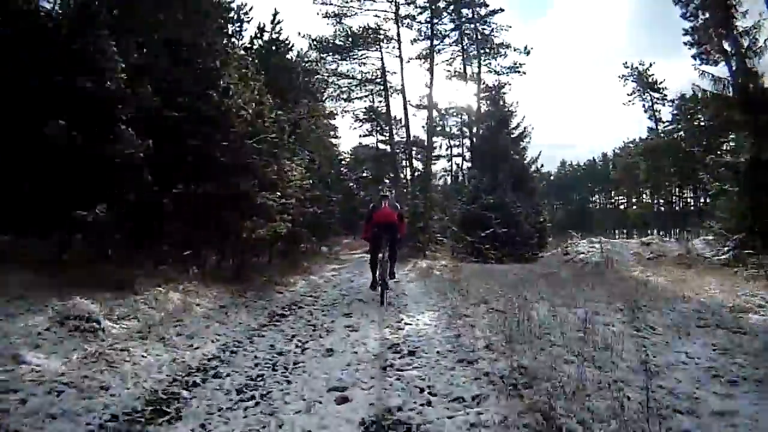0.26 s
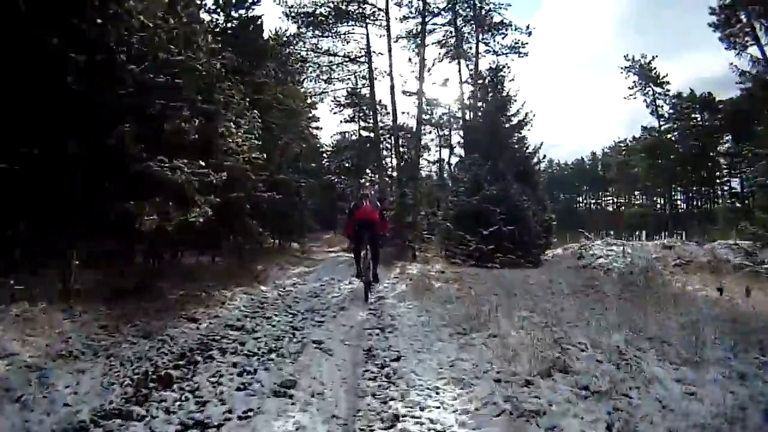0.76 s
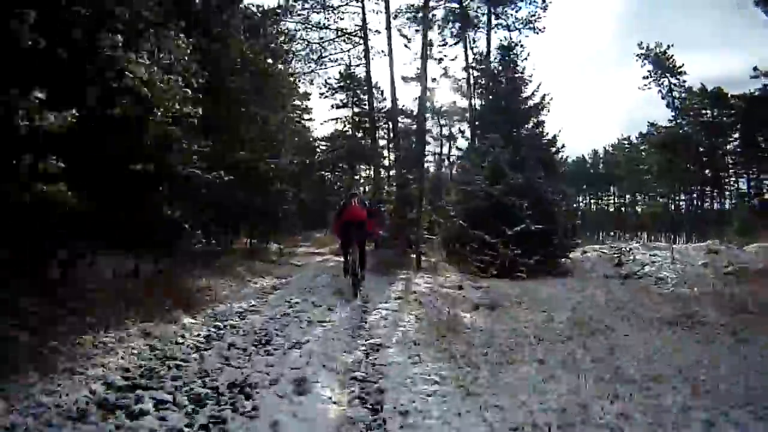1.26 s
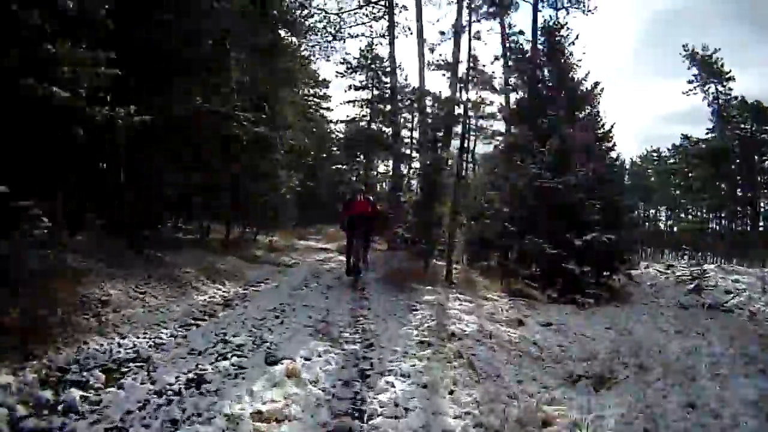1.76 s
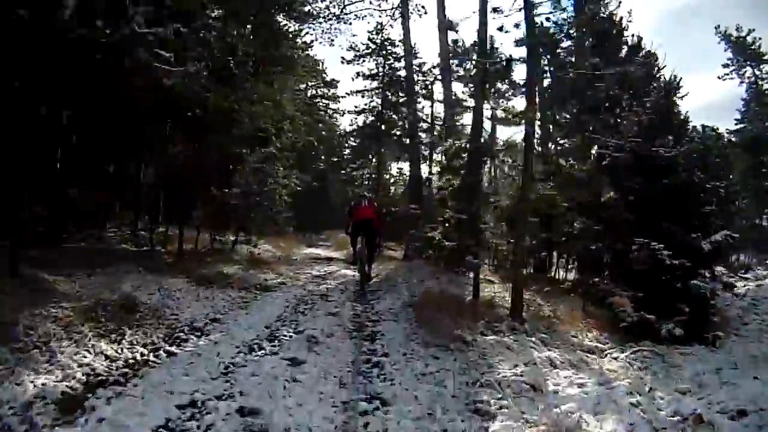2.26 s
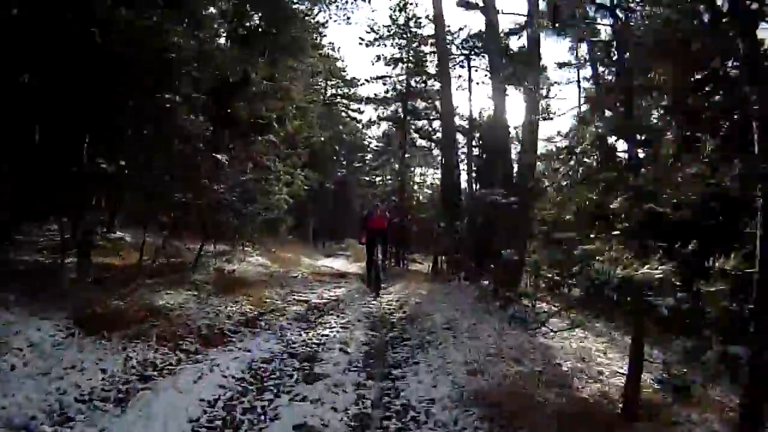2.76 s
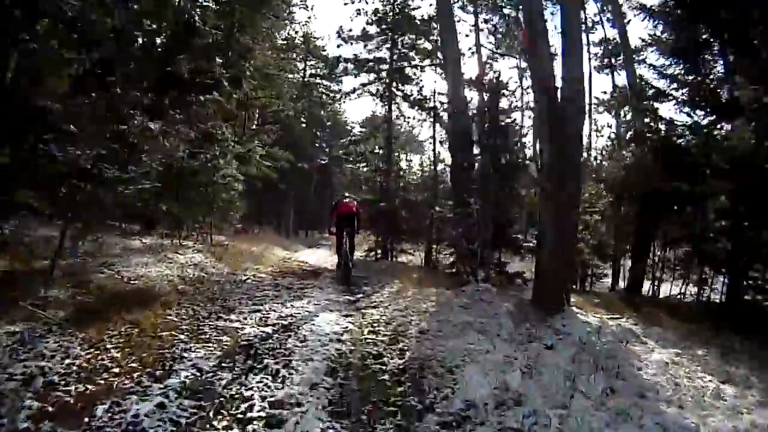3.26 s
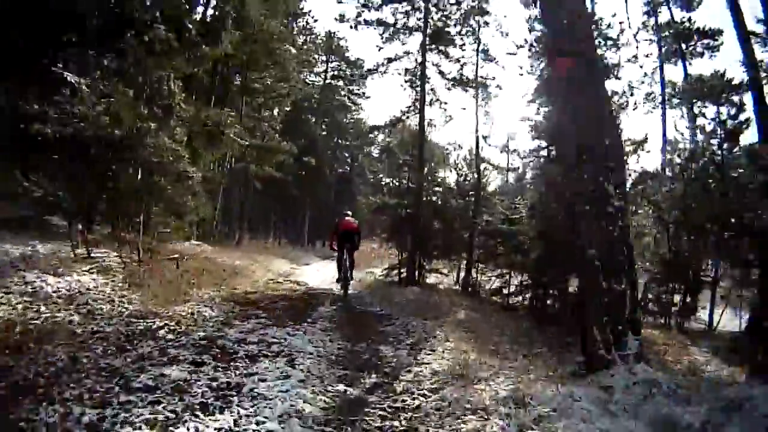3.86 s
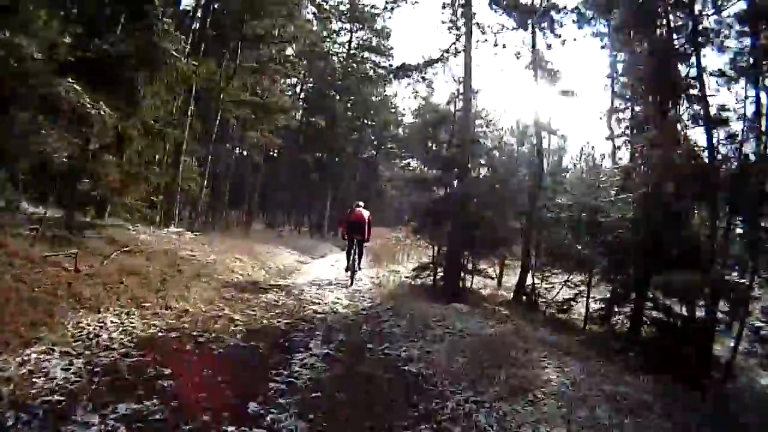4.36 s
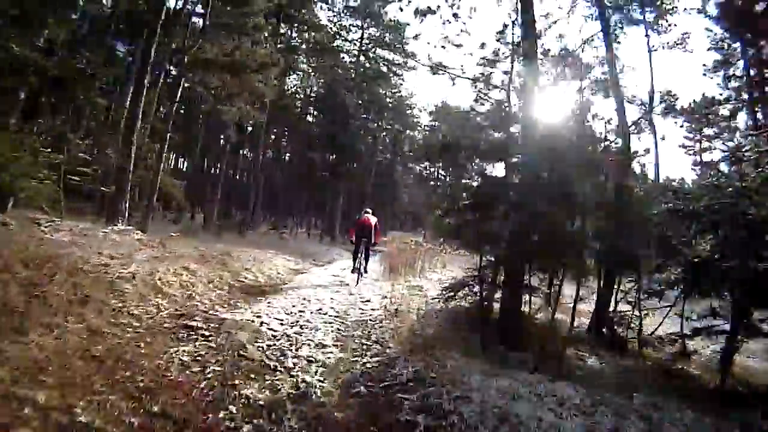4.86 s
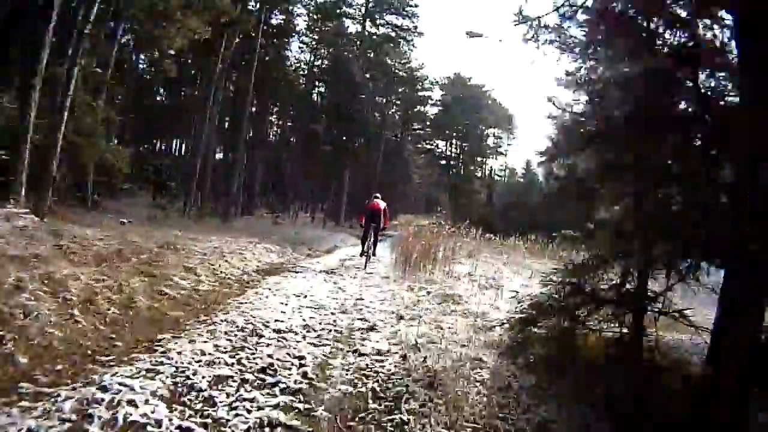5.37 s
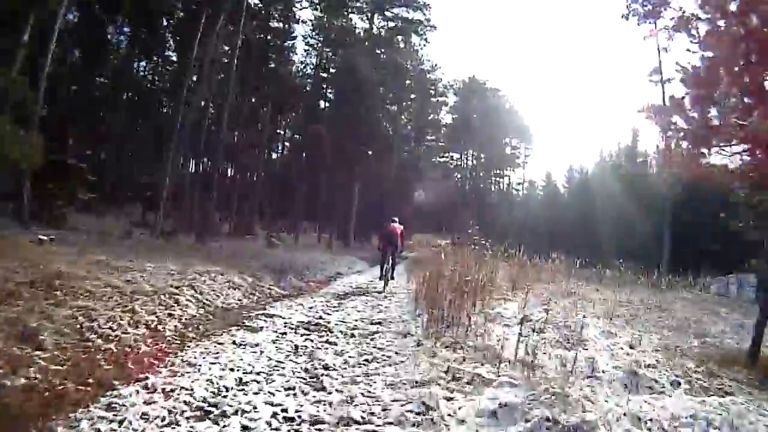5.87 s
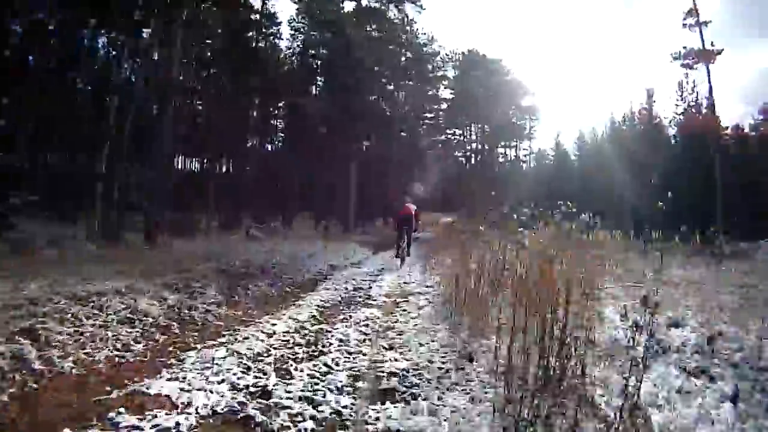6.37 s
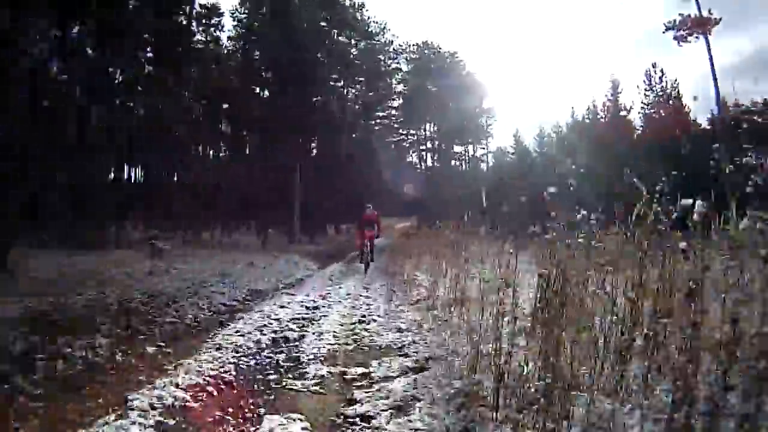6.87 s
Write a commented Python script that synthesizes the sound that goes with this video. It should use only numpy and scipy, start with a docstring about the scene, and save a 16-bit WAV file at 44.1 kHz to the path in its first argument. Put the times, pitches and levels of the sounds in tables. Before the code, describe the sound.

A bicycle rides a frozen forest track, heard through a small camera clamped to the bike. Throughout, deep frame sway around 50 Hz and low mount rumble surge unevenly, beneath a quieter, grainy crunch of tyres on icy grit. From 0 to 3 s it is relatively calm: scattered tiny plastic ticks and weak thumps, with clearer clicks around 2.3 s. A sharp tick comes at 3.2 s; from 3.55 bumps build to the hardest clack at 3.7 s, with a brief buzz and crunch. It eases, then double knocks hit at 4.55-4.65 s. From 5 to 6.4 s the ground is loose and rough: frequent thumps, bright grit snaps, case chatter and short buzzes. Afterwards ticks thin out, while low surges swell at 6.8 and 7 s, with a last thump. Sound is close, dry, nearly mono, with coarse digital brightness and faint stereo fizz.

```python
"""A frozen, bumpy forest track, heard by a small camera clamped to a bicycle.
Tyre rumble and frame sway are noise-driven resonances that reach the microphone through the mount.
Grit crunches as dense grains and cracks as bright clicks; bumps thump the mount as struck resonances,
and the plastic case ticks, chatters and buzzes. A slow converter holds each sample, so the lows
reappear as bright images; a grainy copy of the sound, mostly treble, sets left and right apart."""
import sys
import numpy as np
from scipy import signal
from scipy.fft import rfft, irfft
from scipy.io import wavfile
from scipy.ndimage import uniform_filter1d

SR = 44100
rng = np.random.default_rng(int(sys.argv[2]) if len(sys.argv) > 2 else 0)


def materialize(psi):
    """Save the field psi as 16-bit PCM at rate SR to the path in sys.argv[1].

    A 1-D psi becomes a single channel; in a 2-D psi each row is a channel.
    """
    bounded = np.clip(np.atleast_2d(psi).T, -1, 1)
    quanta = np.round(bounded * 32767).astype(np.int16)
    wavfile.write(sys.argv[1], SR, quanta)


def attenuation_scalar(level_db):
    """Turn a level in dB into a linear amplitude multiplier (20 dB per decade)."""
    decades = np.asarray(level_db, float) / 20
    return 10 ** decades


N = 313551
TIME_S = np.arange(N) / SR

# slow base levels of the ride, before surges, patches and mix gains: (time [s], frame sway [dB],
# mount rumble [dB], tyre crunch [dB], looseness of the grit [dB])
RIDE_LEVELS = [(0.0, -31.5, -36, -54, -75), (1.15, -32, -33.5, -47.5, -74), (1.84, -31, -33, -49.5, -70.5),
               (2.1, -31.5, -36, -50, -73.5), (2.59, -27, -33.5, -51, -73), (3.01, -31, -35, -49.5, -73),
               (3.54, -30, -33.5, -48.5, -74), (3.7, -31, -36, -51.5, -65), (4.39, -30.5, -33.5, -50, -73),
               (5.05, -23.5, -32, -51, -66), (5.21, -25, -30.5, -50, -57.5), (5.66, -28, -29, -50, -58.5),
               (5.84, -27, -30, -51.5, -58), (6.02, -24, -36.5, -48.5, -70), (6.69, -29, -33.5, -51, -70),
               (7.11, -32, -26.5, -47, -69.5)]
# smooth surges of the frame on long humps: (middle [s], half-length [s], sway rise [dB])
HUMP_SURGES = [(0.3, 0.062, 1), (0.484, 0.063, 4.5), (0.81, 0.085, 4), (1.83, 0.077, 7.5),
               (2.254, 0.087, 7), (2.612, 0.17, 0), (2.923, 0.085, 5), (3.113, 0.12, 3),
               (3.283, 0.063, 5.5), (3.466, .12, 6), (3.663, 0.068, 10), (4.023, 0.22, 7),
               (4.31, 0.15, 6.5), (4.447, 0.054, 7), (4.617, 0.13, 7), (4.926, 0.18, 6), (5.1, .14, 1),
               (5.24, 0.055, 1), (5.73, 0.14, 6), (6.067, 0.17, 0), (6.28, 0.24, 2), (6.612, 0.034, 5),
               (6.44, 0.1, 3), (6.766, 0.19, 11), (7.014, 0.13, 13)]
# rough ground under the wheels: (middle [s], half-length [s], rumble rise [dB], crunch rise [dB])
ROUGH_PATCHES = [(0.325, .06, 2.5, 5), (0.601, .06, -1.5, 3), (0.907, .1, 6.5, 3), (1.24, 0.056, 2, 1.5),
                 (1.542, .1, 4.5, 5.5), (1.824, .1, -1, 3.5), (1.988, .08, 6, 7), (2.341, .08, 1.5, 4),
                 (2.963, .08, 4, 3.5), (3.245, .05, 6.5, 5.5), (3.554, .04, 7, 7), (3.643, .08, 15.5, 14.5),
                 (3.702, 0.018, 7, 13), (3.922, 0.043, 11, 4.5), (3.981, .06, 13, 9.5),
                 (4.428, 0.084, 6.5, 4), (4.645, .07, 16.5, 14.5), (4.851, .08, -0.5, 3.5),
                 (5.053, .1, 1.5, 13.5), (5.258, .08, 5, 10), (5.646, .08, -5, 4.5), (5.743, .06, -9, 8.5),
                 (5.951, .14, 6, 8.5), (6.192, .08, 11.5, 5.5), (6.327, .14, 8, 7), (6.519, .06, 3, 5.5),
                 (6.712, .1, 6, 5), (6.938, .1, 1, 5)]
# frame resonances: (frequency [Hz], bandwidth [Hz], relative level [dB])
FRAME_MODES = [(27.6, 16, -15.5), (48.6, 11.6, 5), (85.5, 78, -2)]
# mount resonances: (frequency [Hz], bandwidth [Hz], relative level [dB])
MOUNT_MODES = [(113.6, 45, -5), (205, 44.2, -1.5), (246, 69.5, 0.5), (354.7, 71, -5.5), (486.7, 39, -8)]
# plastic case resonances: (frequency [Hz], bandwidth [Hz], relative level [dB])
CASE_MODES = [(914, 500, -3), (1324, 140, -14), (2110, 356, 1.5), (2435, 402, 3.5), (2970, 420, 1),
              (2850, 15, -29.5), (3793, 325, -3), (4000, 45, -34), (4140, 430, -19), (6040, 3200, -53)]
# colour of the crunch after its way through frame and case: (frequency [Hz], relative level [dB])
CRUNCH_COLOUR = [(350, -62), (600, -27), (660, -15.5), (755, -1), (1030, -6), (1270, -5.5), (1700, -9),
                 (2470, -6.5), (3260, -18), (5900, -29.5), (7670, -23), (13000, -120)]
# dry cracks of flung grit: (time [s], relative level [dB])
GRIT_CRACKS = [(3.699, -28), (3.74, -44), (5.07, -29), (5.1302, -45), (5.204, -48), (5.252, -52),
               (5.3, -51), (5.3478, -38), (5.4264, -33), (5.4566, -38), (5.564, -44), (5.617, -34),
               (5.702, -28), (5.729, -49), (5.867, -49), (5.878, -36.5), (5.889, -44), (5.9284, -38),
               (5.997, -38), (6.253, -36), (6.265, -38), (6.313, -30)]
# clear case ticks: (time [s], relative level [dB], favoured frequency [Hz])
CASE_TICKS = [(0.0277, -22, 2140), (0.5322, -19, 2480), (0.7766, -23.5, 3000), (1.1456, -28.5, 2800),
              (1.5658, -16.5, 2400), (1.6893, -31, 2270), (1.7923, -20, 2330), (1.847, -33, 2160),
              (1.8693, -16, 2400), (1.9462, -21, 2510), (1.9704, -25.5, 2490), (1.9889, -27, 2510),
              (2.0241, -15, 2470), (2.1165, -28, 2400), (2.3194, -31, 2470), (2.3362, -11.5, 2440),
              (2.365, -30, 2510), (2.4717, -13.5, 2390), (2.7008, -28.5, 2440), (2.7563, -31, 2440),
              (2.9039, -26.5, 2290), (2.958, -15, 2680), (3.173, -27, 2240), (3.2355, -2.5, 2220),
              (3.2389, -10, 2840), (3.2534, -28, 2860), (3.47, -29, 2830), (3.4925, -21, 2190),
              (3.5864, -24, 2120), (3.6207, -19, 2260), (3.6317, -10, 2930), (3.642, -19, 2960),
              (3.6716, -11.5, 2990), (3.6986, 5, 2000), (3.7354, -16, 2340), (3.7515, -18, 2860),
              (3.779, -30, 2020), (3.8013, -29, 2190), (3.8162, -32, 2170), (3.8396, -23, 2110),
              (3.9235, -25, 2330), (3.9438, -16, 2100), (3.965, -33, 2210), (3.9829, -12, 2550),
              (4.0125, -32, 3100), (4.3847, -18, 2340), (4.433, -24, 2200), (4.4499, -15.5, 2540),
              (4.5474, -22.5, 2100), (4.6314, -19, 2090), (4.6463, -1.5, 1880), (4.6694, -18, 2210),
              (4.716, -21, 2320), (4.7658, -11.5, 2590), (4.821, -24, 2390), (4.8998, -14.5, 2650),
              (4.9748, -24, 2200), (5.0509, -7, 2530), (5.0694, -21, 2220), (5.1198, -18.5, 2540),
              (5.1822, -10.5, 2600), (5.2375, -19, 2510), (5.2472, -12, 2160), (5.2942, -25, 2270),
              (5.3517, -21.5, 2230), (5.419, -25, 3640), (5.464, -13.5, 2480), (5.523, -31, 2510),
              (5.5815, -26, 2250), (5.6316, -23, 3030), (5.6557, -9.5, 2280), (5.6698, -19.5, 2880),
              (5.7037, -15, 2240), (5.7494, -9, 2260), (5.768, -29, 2130), (5.7827, -27, 2160),
              (5.8065, -24, 2150), (5.8731, -32, 2130), (5.9079, -12, 2390), (5.9582, -6, 2450),
              (5.974, -28, 2210), (6.0177, -23.5, 2400), (6.0566, -27.5, 2380), (6.2104, -12, 2450),
              (6.297, -7, 2440), (6.315, -15, 2260), (6.353, -6, 2600), (6.3714, -13, 2340),
              (6.53, -13, 2450), (6.538, -18.5, 2240), (6.8424, -9, 2600), (6.8564, -12, 2300),
              (6.9098, -25.5, 2440), (7.0419, -19.5, 2090)]
# bumps that strike the mount: (time [s], relative level [dB], favoured frequency [Hz])
MOUNT_BUMPS = [(0.534, -22.5, 482), (0.595, -25, 213), (0.896, -17, 283), (1.77, -30, 223),
               (1.853, -21, 250), (2.337, -20, 482), (2.424, -15.5, 253), (2.519, -24, 248),
               (2.566, -19, 226), (3.238, -23, 412), (3.557, -10, 246), (3.601, -17, 256),
               (3.633, -11.5, 266), (3.693, -4.5, 409), (3.905, -21, 234), (3.983, -12, 194),
               (4.547, -6, 299), (4.584, -16.5, 283), (4.617, -10.5, 205), (4.634, -3.5, 205),
               (4.645, -2, 467), (4.764, -22, 476), (4.849, -13.5, 234), (5.003, -12, 264),
               (5.039, -11.5, 202), (5.066, -6, 221), (5.224, -12.5, 205), (5.291, -10.5, 252),
               (5.35, -5.5, 300), (5.608, -12.5, 257), (5.628, -3, 317), (5.695, -16.5, 226),
               (5.721, -11, 255), (5.749, -14, 220), (5.919, -14, 223), (5.965, -6.5, 223),
               (5.982, -7.5, 220), (6.116, -19, 199), (6.156, -16, 256), (6.227, -12.5, 221),
               (6.294, -20, 269), (6.34, -15.5, 253), (6.366, -9, 226), (6.533, -20, 239),
               (6.678, -23, 223), (6.717, -9.5, 213), (6.916, -12.5, 230), (6.977, -20, 215),
               (7.04, -8.5, 276)]
# buzzing of the case in its clamp: (start [s], length [s], relative level [dB])
CASE_BUZZES = [(3.549, 0.023, -42), (3.59, 0.039, -36), (3.624, 0.04, -29.5), (3.695, 0.0073, -11.5),
               (3.905, 0.018, -44), (3.941, 0.014, -28), (4.007, 0.027, -46.5), (4.628, 0.05, -35.5),
               (4.645, 0.0057, -20), (5.041, 0.036, -29.5), (5.241, 0.014, -26), (5.422, .014, -35),
               (5.612, 0.034, -34.5), (5.872, .03, -45), (5.953, 0.032, -31), (6.181, 0.011, -41.5),
               (6.249, 0.023, -38.5)]

CLUMP_DB = 9   # spread of the fine grit's rate
FAINT_TICKS, FAINT_DB, FAINT_SPREAD_DB, FAINT_HZ = 60, -31.5, 5, 2400   # count, middle, either way, middle
CONVERTER_HZ, TOP_HZ = 12000, 16200   # converter sample rate, corner of the steep low-pass


def rms_one(x):
    """Normalisation: equal mean power, rms 1."""
    return x / np.sqrt(np.mean(x ** 2) + 1e-20)


def drift(rate_hz):
    """Low-pass random process: noise at SR / 20 through two equal poles, spread 1, then interpolated."""
    pole = np.exp(-40 * np.pi * rate_hz / SR)
    noise = rng.standard_normal(N // 20 + 2002)
    slow = signal.lfilter([1], [1, -2 * pole, pole * pole], noise)[2000:]   # start-up is cut off
    return np.interp(np.arange(N) / 20, np.arange(len(slow)), rms_one(slow))


def swells(middle_s, half_s, rise_db):
    """Superposition of raised-cosine level rises, in dB over time."""
    out = np.zeros(N)
    for middle, half, rise in zip(middle_s, half_s, rise_db):
        at = np.arange(max(int((middle - half) * SR), 0), min(int((middle + half) * SR), N))
        phase = np.pi / 2 * np.clip((at / SR - middle) / half, -1, 1)
        out[at] += rise * np.cos(phase) ** 2
    return out


def butter(x, hz, kind, order=2):
    """Maximally flat filtering: a Butterworth high- or low-pass."""
    return signal.sosfilt(signal.butter(order, hz, kind, fs=SR, output="sos"), x)


def evened(x, over_s, share):
    """Gain control by the short-time rms: a share of the chance swells is divided out."""
    level = np.sqrt(uniform_filter1d(x ** 2, int(over_s * SR)) + 1e-4)
    return rms_one(x / level ** share)


def grains(per_s, size_db):
    """Shot noise: randomly timed clicks of either sign and very uneven size, rms 1."""
    sizes = attenuation_scalar(size_db * np.minimum(rng.exponential(1, N), 3)) * rng.choice([-1, 1], N)
    return rms_one(sizes * (rng.random(N) < per_s / SR))


def resonate(x, hz, width_hz):
    """Damped oscillator: a two-pole resonance that a unit click sets ringing with height about 1."""
    radius, angle = np.exp(-np.pi * width_hz / SR), 2 * np.pi * hz / SR
    poles = [1, -2 * radius * np.cos(angle), radius * radius]
    return signal.lfilter([0, np.sin(angle)], poles, x + 1e-18)


def shaken(modes, drive, flicker_db, flicker_hz):
    """Modal response to a steady drive: each mode swells and fades on its own; sum of rms 1."""
    out = np.zeros(N)
    for k, (hz, width_hz, db) in enumerate(modes):
        level = attenuation_scalar(db + flicker_db * drift(flicker_hz))
        out += level * rms_one(resonate(drive, hz, width_hz)) * (-1) ** k   # alternate polarity
    return rms_one(out)


def struck(modes, blows, slope_db, spread_db, depth, jolt_db, thin_hz, contact_s, tail_db, tail_s):
    """Modal response to impact: contact, two bounces and a dying rattle favour modes near the blow's pitch."""
    s, peak_db, own_hz = np.transpose(blows)
    chance = rng.standard_normal((len(s), len(modes) + 6))
    later_s = np.abs(chance[:, -6:-3]) * contact_s * [0, 1, 2]
    at = np.clip(((s[:, None] + later_s) * SR).astype(int), 0, N - 1)
    bounce = np.tanh(chance[:, -3:]) * 0.5
    bounce[:, 0] = np.sign(bounce[:, 0])   # the first contact is a full blow
    rattle = attenuation_scalar(tail_db) * grains(3000.0, size_db=5.5)
    fade = np.exp(-1 / (tail_s * SR))
    out = np.zeros(N)
    for k, (hz, width_hz, db) in enumerate(modes):
        detuning = np.abs(np.log2(hz / own_hz))   # octaves
        level = attenuation_scalar(peak_db + db - slope_db * detuning + spread_db * chance[:, k])
        # with these set, a harder blow, and one on rough ground, reaches deeper into the low modes
        octaves_down = max(np.log2(1900.0 / hz), 0)
        level = level * attenuation_scalar((depth * (peak_db + 15) + jolt_db[at[:, 0]]) * octaves_down)
        # rings narrower than thin_hz grow less than the blow
        level = level * attenuation_scalar(-0.4 * np.maximum(peak_db + 2, 0) * (width_hz < thin_hz))
        clicks, starts = np.zeros((2, N))
        np.add.at(clicks, at, level[:, None] * bounce)
        np.add.at(starts, at[:, 0], level)
        tail = signal.lfilter([1], [1, -fade], starts + 1e-18) * rattle
        out += resonate(clicks + tail, hz, width_hz) * (-1) ** k
    return out


def frame_sway():
    """Forced vibration: noise drives the low frame modes."""
    sway = shaken(FRAME_MODES, rng.standard_normal(N), flicker_db=5.0, flicker_hz=3.2)
    return evened(sway, over_s=0.05, share=0.94)


def mount_rumble():
    """Structure-borne sound: noise and lumpy ground, as sparse grains, drive the mount modes."""
    lumps = rng.standard_normal(N) + 1.33 * grains(150.0, size_db=3.5)
    rumble = shaken(MOUNT_MODES, lumps, flicker_db=3.5, flicker_hz=10.8)
    return evened(rumble, over_s=0.0275, share=0.52)


def tyre_crunch():
    """Spectral shaping: dense grains over hiss, clumped in level, are coloured by frame and case."""
    hz = np.fft.rfftfreq(N, 1 / SR) + 1
    colour_hz, colour_db = np.transpose(CRUNCH_COLOUR)
    colour = attenuation_scalar(np.interp(np.log(hz), np.log(colour_hz), colour_db))
    grit = rng.standard_normal(N) + 0.71 * grains(900.0, size_db=8.0)
    clumps = attenuation_scalar(2.86 * drift(31.0) + 0.88 * drift(58.0))
    return rms_one(irfft(rfft(grit * clumps) * colour, N))


def case_chatter(roughness):
    """Random excitation of modes: rougher ground shakes the case more often."""
    contacts = grains(170.0 * roughness, size_db=4.0)
    return shaken(CASE_MODES, contacts, flicker_db=13.0, flicker_hz=12.4)


def grit_snaps(flying):
    """Impulsive radiation: clear dry cracks crumble briefly, fine ones fill rough, loose ground."""
    s, level_db = np.transpose(GRIT_CRACKS)
    cracks = np.zeros(N)
    cracks[(s * SR).astype(int)] = attenuation_scalar(level_db + 27.5)
    fade = np.exp(-1 / (0.0091 * SR))   # 9.1 ms decay
    crumble = signal.lfilter([1], [1, -fade], cracks + 1e-18) * grains(2200.0, size_db=8.5)
    fine_per_s = 230.0 * flying * attenuation_scalar(CLUMP_DB * drift(14.0))
    fine = attenuation_scalar(-53) * flying ** 1.2 * grains(fine_per_s, size_db=5.0)
    return butter(cracks + attenuation_scalar(-22.0) * crumble + fine, 2300.0, "high")


def faint_ticks(flying):
    """Inhomogeneous point process: weak ticks fall oftener on rough, loose ground; rows as CASE_TICKS."""
    when, size, pitch = rng.random((FAINT_TICKS, 3)).T
    odds = np.cumsum(flying ** 1.3)
    s = np.interp(when, odds / odds[-1], TIME_S)
    level_db = FAINT_DB + FAINT_SPREAD_DB * (2 * size - 1)
    return np.transpose([s, level_db, FAINT_HZ * 1.12 ** (2 * pitch - 1)])


def case_ticks(flying, crunch_db):
    """Impact on a light shell: short contacts ring the case, lower modes joining in on rough ground."""
    blows = np.vstack([CASE_TICKS, faint_ticks(flying)])
    ticks = struck(CASE_MODES, blows, slope_db=10.0, spread_db=1.5, depth=0.5,
                   jolt_db=1.27 * (crunch_db + 40.5), thin_hz=100, contact_s=0.00062,
                   tail_db=-20.0, tail_s=0.0034)
    return butter(butter(ticks, 570.0, "high"), 7000.0, "low", order=3)


def mount_thumps():
    """Impact on a heavy body: bumps ring the low mount modes, with slower bounces than the case."""
    thumps = struck(MOUNT_MODES, MOUNT_BUMPS, slope_db=4.5, spread_db=1.0, depth=0,
                    jolt_db=np.zeros(N), thin_hz=0, contact_s=0.00327, tail_db=-39.0, tail_s=0.011)
    return butter(thumps, 154.0, "high")


def case_buzz():
    """Repeated contact: dense uneven clicks drive the case modes for as long as each buzz lasts."""
    level = np.zeros(N)
    for s, length, db in CASE_BUZZES:
        inside_s = np.minimum(TIME_S - s, s + length - TIME_S)
        level += attenuation_scalar(db) * np.clip(inside_s / 0.0017 + 0.5, 0, 1)   # 1.7 ms edges
    contacts = evened(grains(1500.0, size_db=1.5), over_s=0.008, share=0.98)
    buzz = shaken(CASE_MODES, contacts, flicker_db=7.0, flicker_hz=46.0)
    return level * butter(buzz, 800.0, "high")


def scene():
    """Superposition: every source adds at one microphone, the same in both channels."""
    s, *levels = np.transpose(RIDE_LEVELS)
    sway_db, rumble_db, crunch_db, loose_db = [np.interp(TIME_S, s, level) for level in levels]
    middle_s, half_s, rumble_rise, crunch_rise = np.transpose(ROUGH_PATCHES)
    sway_db = sway_db + swells(*np.transpose(HUMP_SURGES)) + 0.93 * drift(13.4)
    rumble_db = rumble_db + swells(middle_s, half_s, rumble_rise) + 2.0 * drift(8.8)
    crunch_db = crunch_db + swells(middle_s, half_s, crunch_rise) + 1.3 * drift(8.8)
    roughness = attenuation_scalar(0.43 * (crunch_db + 41.5))
    flying = roughness * attenuation_scalar(0.67 * (loose_db + 65.5))   # loose grit flies up more often

    mono = attenuation_scalar(sway_db) * frame_sway()
    mono += attenuation_scalar(rumble_db) * mount_rumble()
    mono += attenuation_scalar(crunch_db) * (attenuation_scalar(1.5) * tyre_crunch() + attenuation_scalar(-14.5) * case_chatter(roughness))
    mono += grit_snaps(flying)
    mono += attenuation_scalar(-2.5) * case_ticks(flying, crunch_db)
    mono += attenuation_scalar(3) * mount_thumps()
    mono += case_buzz()
    return np.array([mono, mono])


def slow_converter(dry):
    """Zero-order hold: overload clips, and the held steps carry mirror images of the lows."""
    slow = signal.resample_poly(np.clip(dry, -1, 1), CONVERTER_HZ // 300, SR // 300, axis=1)
    held = np.repeat(slow, 4, axis=1)
    stepped = signal.resample_poly(held, SR // 300, 4 * CONVERTER_HZ // 300, axis=1)[:, :N]
    return butter(butter(stepped, 14600.0, "low", order=1), TOP_HZ, "low", order=14)


def channel_fizz(mono):
    """Amplitude modulation: low-passed noise makes a grainy copy, mostly treble, that comes and goes."""
    wobble = rms_one(butter(rng.standard_normal(N), 440.0, "low"))
    apart = attenuation_scalar(-9.5) * butter(mono, 4500.0, "high", order=10)
    apart = apart + attenuation_scalar(-43.5) * butter(mono, 380.0, "high", order=1)
    presence = np.clip(0.57 + 0.97 * drift(2.2), 0, 1.3)
    return apart * wobble * presence


def band_limit(x):
    """A steep low-pass at the top of the band."""
    return signal.sosfilt(signal.butter(12, 16400, fs=SR, output="sos"), x)


def record(dry):
    """Sample-and-hold, then antiphase addition: the fizz enters left and right with opposite signs."""
    stepped = slow_converter(dry)
    mix = np.clip(stepped + channel_fizz(stepped[0]) * [[1], [-1]], -1, 1)
    return band_limit(mix)


dry = scene()
out = record(dry)
materialize(out)
```